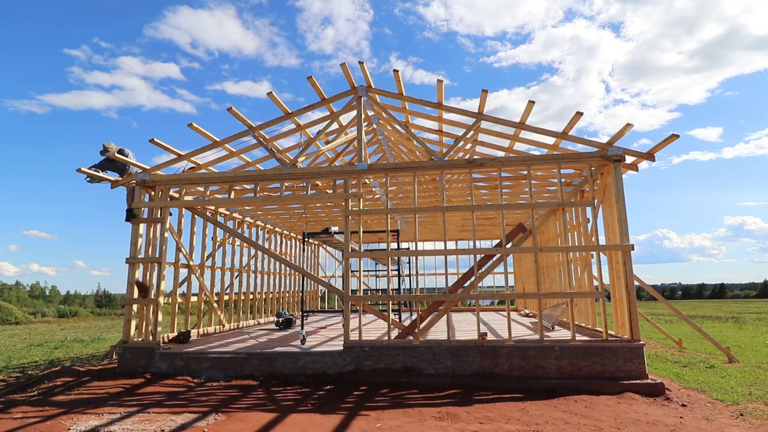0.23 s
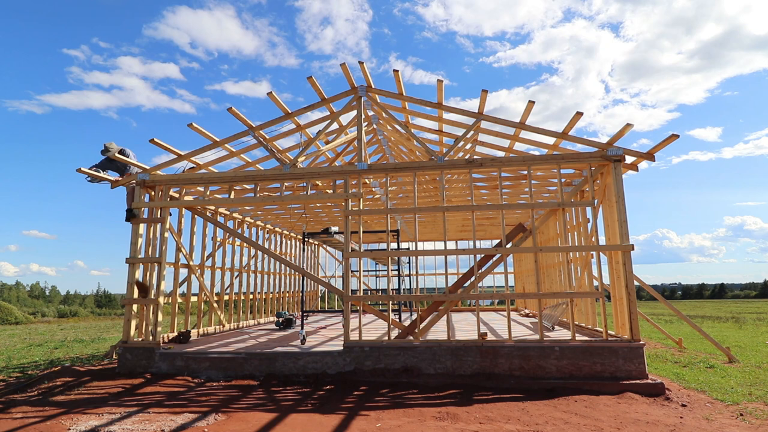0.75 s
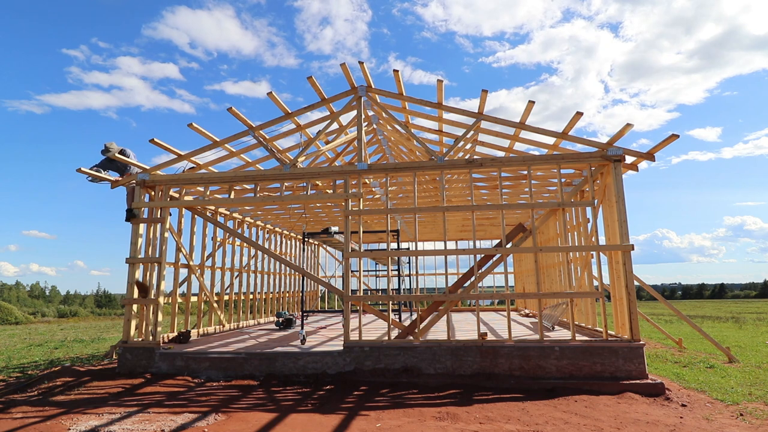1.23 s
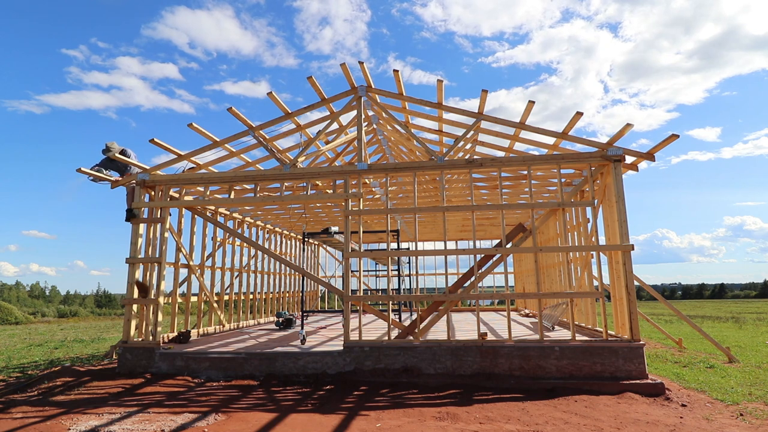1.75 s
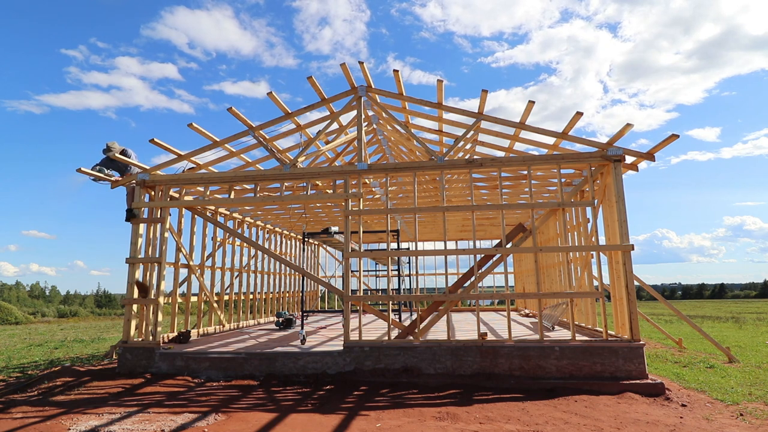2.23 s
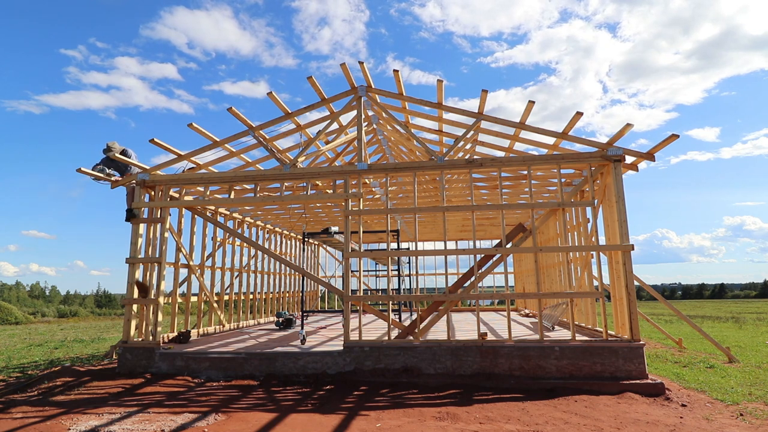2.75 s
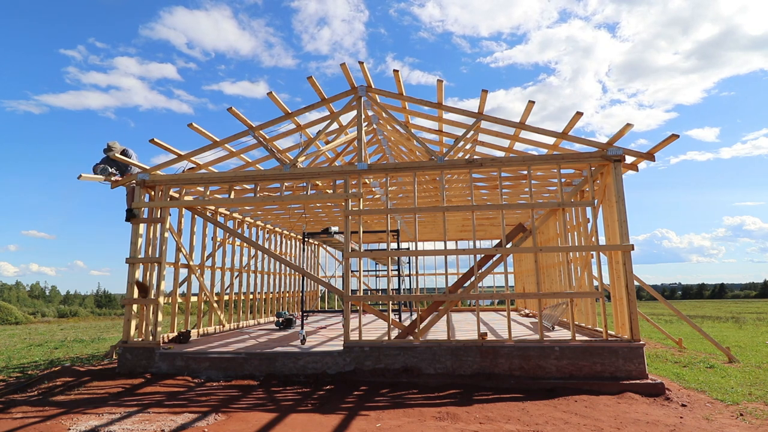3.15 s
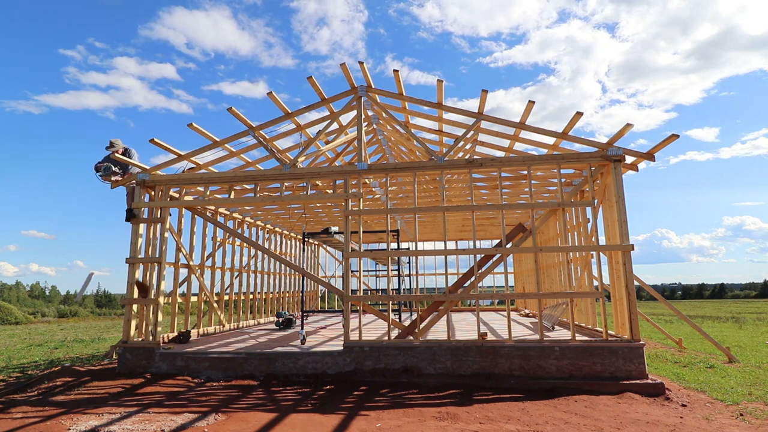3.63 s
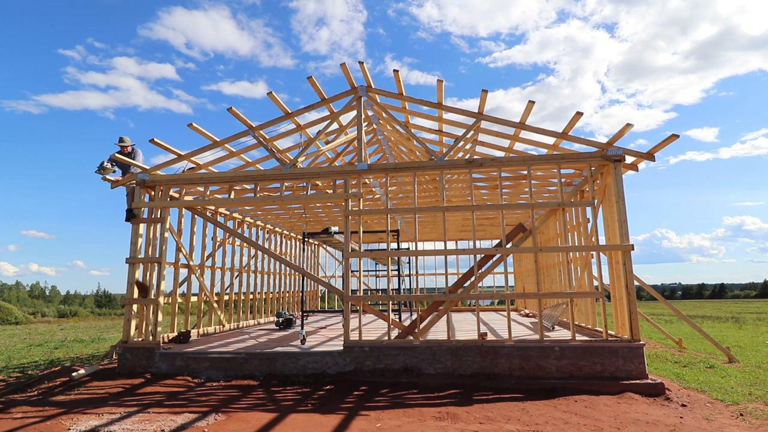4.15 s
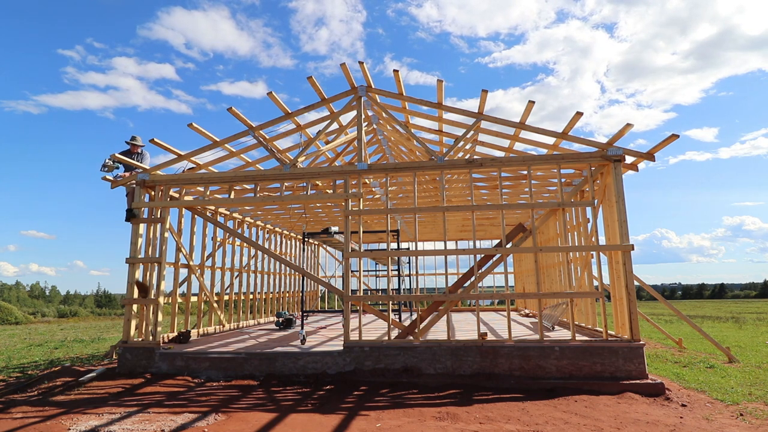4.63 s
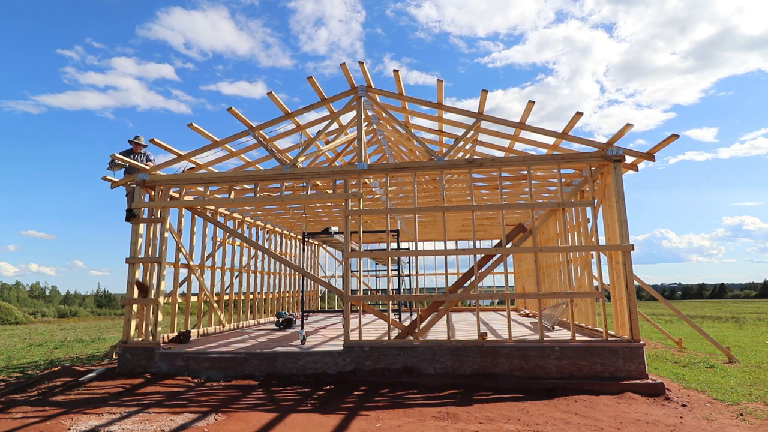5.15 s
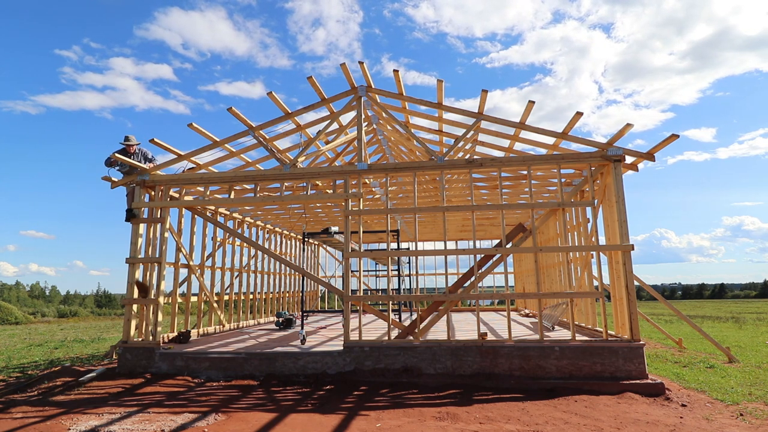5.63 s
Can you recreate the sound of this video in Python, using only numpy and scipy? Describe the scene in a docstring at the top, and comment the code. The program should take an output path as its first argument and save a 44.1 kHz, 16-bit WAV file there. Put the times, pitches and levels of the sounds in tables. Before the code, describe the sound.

Open air, one microphone, light wind rumble. A circular saw is already spinning at the start, with a rushing, humming motor climbing slightly in pitch and short squeals around 0.2 to 0.4 s. At about 0.5 s the teeth enter a board: a bright, gritty rasp grows, with wavering steel tones flaring until about 1.5 s. From 1.7 s the motor labours and its pitch sags, lowest around 2.8 to 3.1 s, while the rasp is dense and full. Splintering bursts at 3.25 and 3.36 s mark the breakthrough; the rasp stops abruptly and the free blade whines and rings. At 3.7 s the brake pulls the whine steeply down, with dry whirring and hiss fading over the next second or so. The offcut hits hard at 4.0 s, then bumps faintly around 4.3, 4.5 and 4.8 s amid a wind gust. Quiet breeze remains, dropping to silence at 5.55 s and returning briefly at 5.85 s.

```python
"""A circular saw cuts the end off a rafter in the open air: noise torn by the teeth makes the rasp,
and wavering tones and narrow resonances make the steel blade sing over the hum and rush of the motor.
The load drags the speed down; the saw then runs free and is braked with a falling whine.
The offcut knocks on the ground as decaying wood tones, and low filtered noise is the wind.
Near the end the sound drops out, returning only for the last instant."""
import sys
import numpy as np
from scipy import signal
from scipy.fft import rfft, irfft
from scipy.io import wavfile

SR = 44100
rng = np.random.default_rng(int(sys.argv[2]) if len(sys.argv) > 2 else 0)


def int16_out(signal):
    """Quantize to a 16-bit WAV file."""
    q = np.round(np.clip(np.atleast_2d(signal).T, -1, 1) * 32767)
    wavfile.write(sys.argv[1], SR, q.astype(np.int16))


N = 259240
T = np.arange(N) / SR  # time of every sample, s
HZ = np.fft.rfftfreq(N, 1 / SR)  # frequencies of the spectrum

# blade speed under power, before the brake slows it: [t/s, teeth passing per second]
POWERED_SPEED = [(0, 1910), (.55, 2100), (.8, 2135), (1.4, 2140), (1.7, 2085), (2.05, 1945), (2.3, 1860),
                 (2.8, 1808), (3.14, 1808), (3.42, 1920)]
FULL_SPEED = 2140  # teeth per second
TEETH = 24  # on the blade

# the cut: the teeth enter the board, are fully buried, break through; then the brake comes on
ENTER_S, BURIED_S, EXIT_S, BRAKE_S = 0.53, 2.18, 3.385, 3.675


def rasp(speed, gating=0.28, runout=0.059, grain_db=2, count=3):
    """Each tooth tears a burst of fibres, harder once a turn, until the blade leaves the wood."""
    # colour of the torn wood: [f/Hz, level/dB]
    rasp_colour = [(150, -8), (300, -9.5), (900, -5.5), (1700, 7.5), (2600, -3.5), (4200, -2.5), (5400, -4),
                   (6200, -3.5), (7200, 3.5), (8000, 3.5), (9300, 4.5), (10500, -3), (13000, -3.5),
                   (15500, -10.5)]
    tooth = turns(speed)
    tooth_bursts = 1 + gating * np.cos(tooth)
    turn_bursts = 1 + runout * np.cos(tooth / TEETH)
    tearing = tooth_bursts * turn_bursts * amp(grain_db * drift(210))
    # as the point of contact wanders, it favours one family of modes after another
    shares = amp(8 * np.array([drift(1.5) for _ in range(count)]))
    shares /= np.linalg.norm(shares, axis=0)
    noise = 0
    for share in shares:
        torn = tearing * rng.standard_normal(N)
        noise = noise + share * shaped(torn, colour(rasp_colour) * crowded_modes(), (9300, 15500))
    return noise * bite()


def crowded_modes(hz_apart=75):
    """The blade's dense high modes: random narrow peaks and dips, fading in from 2 to 4 kHz."""
    at = np.arange(0, SR / 2, hz_apart)
    bumps = np.interp(HZ, at, rng.standard_normal(len(at)))
    return amp(5 * bumps * np.clip((HZ - 2000) / 2000, 0, 1))


def bite(buried_db=-31, graze=.06, ease_db_per_s=4):
    """The rasp grows with depth, eases once the blade is buried, and jumps where wood splinters."""
    # splinters at the entry and the breakthrough: [t/s, level/dB, time to fall to 1/e /s]
    splinters = [(.58, -43, .05), (3.24, -36, 0.048), (3.36, -26.5, 0.014)]
    easing = amp(buried_db - ease_db_per_s * np.maximum(T - BURIED_S, 0))
    feed = (graze + (1 - graze) * depth()) * easing
    return (feed + swells(splinters)) * uncut()


def singing(speed, fade_s=.17):
    """Rubbing keeps a few modes sounding; a deep kerf damps them; once free they ring until the brake."""
    # singing modes: [f/Hz at full speed, pitch waver/Hz, level/dB at the edge of the board,
    # level/dB buried, level/dB running free, family 0-2]
    singing_modes = [(2207, 3, -33.5, -42, -42, 0), (2555, 3, -37, -46, -48, 1),
                     (2909, 4, -35.5, -44, -37, 1), (3380, 5, -37, -48, -33, 2)]
    # the kerf rubs one family into a flare: [t/s, rise/dB, time to fall to 1/e /s, family 0-2]
    flares = [(.76, 12, .12, 0), (1.49, 12, .095, 0), (3.32, 10, .05, 0), (.68, 6, .06, 1),
              (1.17, 6, .08, 1), (1.52, 7, .08, 1), (.89, 9, .06, 2), (1, 7, .09, 2), (1.32, 6, .15, 2)]
    sunk = depth() ** 4
    free = (1 - uncut()) * (1 - ramp(BRAKE_S, fade_s))
    out = 0
    for hz, waver, edge_db, buried_db, free_db, family in singing_modes:
        flare_db = sum(db * swell(s, length) for s, db, length, which in flares
                       if round(which) == round(family))
        cutting_level = contact() * amp(edge_db + sunk * (buried_db - edge_db) + flare_db)
        level = cutting_level + free * amp(free_db)
        tone = np.sqrt(2) * np.sin(turns(sagged(hz, speed) + waver * drift(47.0)))
        out = out + tone * level * amp(2 * drift(27))
    return out


def blade(speed, damping=0.0056, ring_db=7, idle_db=-12, build_s=0.47):
    """The disc's many other modes build up in the wood and swell in turn; in free air they barely ring."""
    # other modes: [f/Hz at full speed, relative level/dB at the edge, relative level/dB buried]
    other_modes = [(2379, -46, -47), (3171, -60, -43), (3820, -48, -46), (4086, -44, -48), (4188, -46, -54),
                   (4360, -45, -49), (4441, -48, -58), (4560, -58, -50), (4899, -52, -47), (5330, -60, -54),
                   (5820, -54, -49), (6298, -54, -54), (6621, -52, -48), (7125, -58, -47), (7343, -47, -52),
                   (7510, -58, -48), (8300, -53, -49), (8414, -48, -52), (9458, -54, -50), (9690, -53, -55),
                   (10245, -62, -51), (10700, -51, -52), (11946, -58, -53)]
    sunk = depth() ** 4
    others = 0
    for hz, edge, buried in other_modes:
        wander_db = 2 * drift(2.5)
        mode = ringing(sagged(hz, speed), damping * hz)  # width is a fraction of the pitch
        others = others + amp(edge + sunk * (buried - edge) + wander_db) * mode
    in_wood = amp(ring_db) * ramp(ENTER_S, build_s) * uncut()
    in_air = amp(idle_db) * (speed / FULL_SPEED) ** 2
    return others * (in_wood + in_air)


def sagged(hz, speed, stiffening=.0022):
    """A mode of the blade sinks a little as the spin that stiffens it slows."""
    lost_speed = np.maximum(speed, .8 * FULL_SPEED) - FULL_SPEED
    return hz + stiffening * lost_speed * np.sqrt(hz)


def teeth(speed, jitter=0.0028, runout=0.11, light_db=-42, labour_db=11.5):
    """Tones tied to the tooth rate throb once a turn, louder as the load drags the motor down."""
    # tones of the teeth and the motor: [multiple of the tooth rate, relative level/dB]
    tooth_orders = [(1, -0.5), (2.002, -30.5), (2.666, -6.5), (3, -25), (0.756, -19), (0.914, -2.5)]
    tooth = turns(speed * (1 + jitter * drift(60)))
    throb = 1 + runout * np.cos(tooth / TEETH)
    tones = sum(amp(db) * np.sin(k * tooth) for k, db in tooth_orders)
    sag = FULL_SPEED - curve(POWERED_SPEED)
    load_level = amp(light_db + labour_db * (sag / sag.max()) ** 2)
    return np.sqrt(2) * tones * throb * contact() * load_level


def squeals(waver_hz=10):
    """Brief squeals and groans: wavering tones that swell and fade."""
    # [t/s, f/Hz, level/dB, time to fall to 1/e /s]
    squeal_list = [(0.19, 1054, -23.5, 0.078), (0.362, 367, -35, 0.31), (0.446, 1086, -29.5, 0.38),
                   (0.889, 4085, -26.5, 0.077), (1.643, 1536, -24.5, 0.046), (1.752, 360.4, -38, .13),
                   (2.98, 1668, -30, 0.12), (3.179, 1084, -29, 0.024)]
    out = 0
    for s, hz, db, length in squeal_list:
        tone = np.sqrt(2) * np.sin(turns(hz + waver_hz * drift(40)))
        out = out + tone * amp(db) * swell(s, length)
    return out


def blade_speed(brake_per_s=1.5, fan_drag=.85):
    """Teeth per second: driven through the cut, then slowed by a steady brake and at first the fan's drag."""
    braking = np.expm1(brake_per_s * np.maximum(T - BRAKE_S, 0))
    return curve(POWERED_SPEED) / (1 + (1 + fan_drag) * braking)


def depth():
    """How far the steady feed has sunk the blade in the board, 0-1."""
    return ramp(ENTER_S, BURIED_S - ENTER_S)


def uncut(release_db_per_s=394.5):
    """1 until the blade breaks through, then dying quickly."""
    return amp(-release_db_per_s * np.maximum(T - EXIT_S, 0))


def contact(grip_s=0.1):
    """How firmly the wood grips the blade, 0-1."""
    return ramp(ENTER_S, grip_s) * uncut()


def rush(speed, echo=0.3, throb=0.1, dull_hz=3500, dulling=0.53,
         hiss_swell_db=-37, hiss_swell_s=.17, hiss_swell_length_s=0.19):
    """Air and gear noise through the housing dulls as it slows; the hiss above swells just after the brake."""
    # colours of the main rush and of the hiss above it: [f/Hz, level/dB]
    rush_colour = [(100, -42.5), (200, -23), (270, -4.5), (360, -5), (520, -6.5), (720, -3.5), (880, -3.5),
                   (1060, 1), (1500, -3.5), (2000, -6), (2700, -2.5), (4000, -1), (4600, -10), (9000, -29)]
    hiss_colour = [(2500, -43.5), (4300, -21), (4900, 2.5), (5500, -10.5), (6500, -6), (7300, -5),
                   (7800, -1), (8750, 2), (9150, -12), (12000, -15.5), (15500, -30)]
    through_housing = colour(rush_colour) * echoed(echo) * amp(housing_db(HZ))
    body = shaped(rng.standard_normal(N), through_housing, (550, 1400))
    dull = irfft(rfft(body) / (1 + (HZ / dull_hz) ** 12), N)
    body = dull + (body - dull) * (speed / FULL_SPEED) ** dulling
    hiss = shaped(rng.standard_normal(N), colour(hiss_colour), (7600, 8900))
    wobble = 1 + throb * np.sin(turns(speed / TEETH))  # once a turn
    body_level = rush_level(speed, top_db=-26.5, power=0.89, dip_db=2.5, floor_db=-60)
    hiss_level = rush_level(speed, top_db=-35.0, power=1.19, dip_db=11, floor_db=-61.5)
    hiss_swell = amp(hiss_swell_db) * swell(BRAKE_S + hiss_swell_s, hiss_swell_length_s)
    return wobble * (body * body_level + hiss * np.hypot(hiss_level, hiss_swell))


def rush_level(speed, top_db, power, dip_db, floor_db, recover_s=0.12):
    """Grows with speed over a floor; the level dips while the loud cutting lasts, then recovers."""
    dip = np.sqrt(depth()) * (1 - ramp(EXIT_S, recover_s))
    driven = amp(top_db - dip_db * dip) * (speed / FULL_SPEED) ** power
    return np.hypot(driven, amp(floor_db))


def housing_db(at_hz):
    """Lift in dB that the cavities of the housing give to a frequency."""
    # cavities of the guard and motor housing: [f/Hz, width/Hz, lift/dB]
    cavities = [(364.4, 41, 1), (647, 69, 8), (1071, 68, 6), (1287, 100, 4), (1581, 290, 12),
                (1970, 210, 5), (2150, 83, 9.5)]
    return sum(db / (1 + (2 * (at_hz - hz) / width) ** 2) for hz, width, db in cavities)


def echoed(echo, fade_hz=3800, echo_s=.00278):
    """Gain at every frequency of a sound joined by its echo off the boards."""
    return 1 + echo / (1 + (HZ / fade_hz) ** 4) * np.exp(-2j * np.pi * HZ * echo_s)


def motor(speed, hum_db=-43, commutator_db=-55, waver_db=3, drone_db=-50):
    """The rotor hums once a turn, its 28 commutator bars whistle, a low drone joins in the deep cut."""
    rotor = .2055 * speed  # turns per second
    hum = np.sin(turns(rotor)) * amp(hum_db + waver_db * drift(2.3))
    whistle = ringing(28 * rotor, 25) * amp(commutator_db)
    drone = ringing(.122 * speed, 8) * amp(drone_db) * depth() ** 4 * uncut()
    return (hum + whistle + drone) * (speed / FULL_SPEED) ** 2


def spin_down(speed, free_db=-29, braking_db=8.5, power=1.46, resonance=1, echo=0.19,
              shake_db=2, backlash=0.017, chatter_db=-2, quiet_speed=240):
    """Unloaded gears whine; the brake loads them and pulls the whine down through the housing's cavities."""
    # partials crowded around twice the tooth rate: [multiple of the tooth rate, relative level/dB]
    whine_orders = [(2, 2), (1.917, -7.5), (1.833, -8.5), (2.083, -6.5), (2.167, -13.5)]
    partials = 0
    for k, db in whine_orders:
        # backlash shakes each partial in pitch and in strength
        strength = amp(db + shake_db * drift(45))
        partials = partials + strength * np.sin(turns(k * speed * (1 + backlash * drift(89.5))))
    chatter = np.sin(turns(2 * speed * (1 + .085 * drift(300))))
    whine = partials + amp(chatter_db) * chatter
    level_db = free_db + braking_db * ramp(BRAKE_S, 0.053) + resonance * housing_db(2 * speed)
    # silent below quiet_speed (teeth per second), full from twice that speed
    fast_enough = np.clip(speed / quiet_speed - 1, 0, 1)
    unloaded = ramp(EXIT_S - .06, 0.036) * fast_enough
    sound = whine * amp(level_db) * (speed / FULL_SPEED) ** power * unloaded
    return irfft(rfft(sound) * echoed(echo), N)


def whirr(speed, rise_s=0.19):
    """The coasting blade whirrs drily; the broad band fades with speed and a thin ring lingers."""
    # [f/Hz, width/Hz, level/dB at full speed, power of speed]
    whirr_bands = [(3143, 450, -17, 1.8), (3040, 50, -37.5, 0.51)]
    bands = 0
    for hz, width, db, power in whirr_bands:
        bands = bands + ringing(np.full(N, hz), width) * amp(db) * (speed / FULL_SPEED) ** power
    return bands * ramp(BRAKE_S, rise_s)


def offcut():
    """The piece of wood lands with one dead knock and tumbles; each knock is a few dying wood tones."""
    # knocks: [t/s, peak level/dB before the limiter, pitch as a factor on the wood tones]
    knock_list = [(3.982, 3.5, 1.08), (4.009, -11, 2.7), (4.263, -21.5, 0.47), (4.287, -21.5, 0.43),
                  (4.408, -52, 0.36), (4.522, -27, 0.48), (4.833, -35, 1.9)]
    # wood tones: [f/Hz before the pitch factor, relative level/dB, time to fall 60 dB /s]
    wood_tones = [(428, 2.5, 0.024), (557, -7, 0.03), (837, -2, 0.025), (1510, -5, 0.0092),
                  (2700, -7, .012), (3890, -13.5, 0.024), (7600, -49, 0.0072)]
    out = np.zeros(N)
    t = T[:SR // 10]
    onset = 1 - np.exp(-(t / .0003) ** 2)
    for s, db, pitch in knock_list:
        tones = sum(amp(level - 60 * t / t60) * np.sin(2 * np.pi * hz * pitch * t)
                    for hz, level, t60 in wood_tones)
        knock = onset * tones
        out[round(s * SR):][:len(t)] += amp(db) * knock / abs(knock).max()
    return out


def wind(breeze_db=-41, gust_db=2):
    """Lumpy rumble on the microphone: low noise as a light breeze with a few gusts."""
    # colour of the rumble: [f/Hz, level/dB]
    wind_colour = [(10, -30.5), (25, 4.5), (60, -2), (90, -8.5), (140, -16), (220, -25), (1500, -65)]
    # gusts: [t/s, level/dB, time to fall to 1/e /s]
    gusts = [(.1, -39, 0.47), (1.22, -37, 0.1), (3.85, -36.5, 0.29), (4.11, -24.5, .08),
             (4.38, -32.5, 0.14), (5.1, -37, 0.56)]
    rumble = shaped(rng.standard_normal(N), colour(wind_colour))
    lumpy = unit(rumble * amp(gust_db * drift(4.1)))
    return lumpy * (amp(breeze_db) + swells(gusts))


def air(air_db=-72):
    """A faint even hiss under everything."""
    return rng.standard_normal(N) * amp(air_db)


def amp(db):
    """Decibels to gain."""
    return 10 ** (np.asarray(db) / 20)


def unit(x):
    """Scales to rms 1."""
    return x / np.sqrt(np.mean(abs(x) ** 2) + 1e-20)


def curve(rows):
    """A table of times and values, at every sample."""
    return np.interp(T, *np.transpose(rows))


def colour(points):
    """Gain at every frequency from a short spectrum."""
    hz, db = np.transpose(points)
    return amp(np.interp(np.log(HZ + 1), np.log(hz), db))


def shaped(x, gain, band=(0, SR)):
    """Filters x and gives it rms 1 within a band."""
    z = rfft(x) * gain
    in_band = (HZ >= band[0]) * (HZ <= band[1])
    return irfft(z, N) / np.std(irfft(z * in_band, N))


def drift(rate_hz, size=8192):
    """Slow random motion of rms 1."""
    hz = np.fft.rfftfreq(size, T[-1] / size)
    slow = irfft(rfft(rng.standard_normal(size)) / (1 + (hz / rate_hz) ** 2))
    return np.interp(T, np.linspace(0, T[-1], size), unit(slow))


def turns(hz):
    """Phase of something turning hz times a second."""
    return 2 * np.pi * np.cumsum(hz) / SR


def ringing(hz, width_hz):
    """A moving resonance kept ringing by random blows, rms 1."""
    r = np.exp(-np.pi * abs(width_hz) * np.sqrt(2) / SR)
    blows = rng.standard_normal(N) + 1j * rng.standard_normal(N)
    slow = signal.lfilter([1], [1, -2 * r, r * r], blows)
    return unit((slow * np.exp(1j * turns(hz))).real)  # moved up to the wanted pitch


def swell(s, length):
    """A smooth rise and fall around one moment, top 1, falling to 1/e after its length."""
    return np.exp(-((T - s) / length) ** 2)


def swells(rows):
    """Summed gain of a table of swells."""
    return sum(amp(db) * swell(s, length) for s, db, length in rows)


def ramp(s, length):
    """Rises from 0 to 1, starting at s."""
    return np.clip((T - s) / length, 0, 1)


def scene():
    """All sources at one microphone."""
    speed = blade_speed()
    cutting = rasp(speed) + singing(speed) + blade(speed) + teeth(speed) + squeals()
    machine = rush(speed) + motor(speed) + spin_down(speed) + whirr(speed)
    return (cutting + machine + offcut() + wind() + air())[None]


def record(dry):
    """A limiter ducks loud peaks, tops are rounded off, the sound drops out, and the treble is cut."""
    ceiling, threshold_db, recovery_db_per_s = .72, -6, 330
    stop_s, resume_s, edge_hz = 5.548, 5.85, 15750
    # hold each peak and let it sink at the recovery rate
    fall = recovery_db_per_s * T
    level_db = 20 * np.log10(abs(dry[0]) + 1e-9)
    peak_db = np.maximum.accumulate(level_db + fall) - fall
    attack = np.ones(250) / 250  # the ducking sets in over 250 samples
    ducked = dry * amp(-signal.lfilter(attack, 1, np.maximum(peak_db - threshold_db, 0)))
    limited = ducked / (1 + (ducked / ceiling) ** 4) ** (1 / 4)
    # fades out in 6 ms up to the stop and back in over 12 ms
    on = np.clip(np.maximum(stop_s - T, (T - resume_s) / 2) / .006, 0, 1)
    lowpass = signal.firwin(511, edge_hz, window=("kaiser", 9), fs=SR)
    return signal.oaconvolve(limited * on, lowpass[None], "same")


dry = scene()
out = record(dry)
int16_out(out)
```